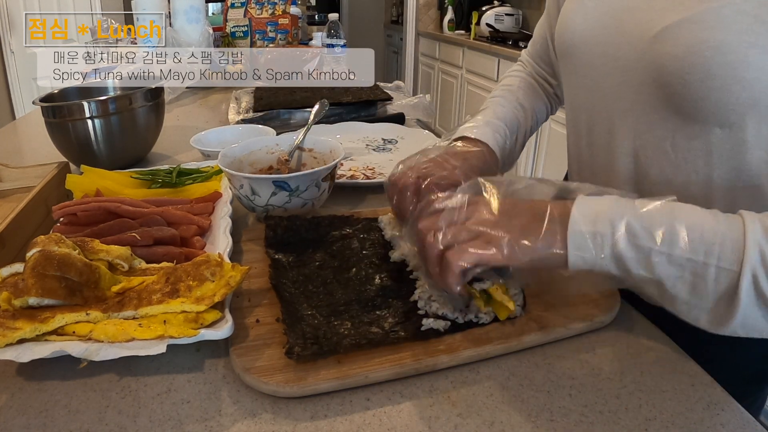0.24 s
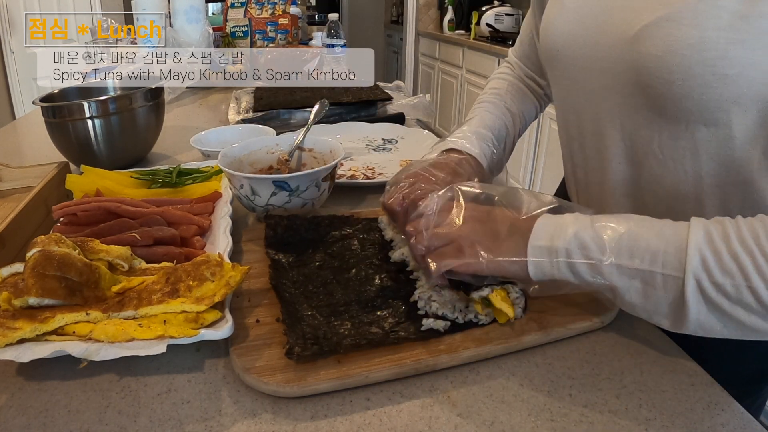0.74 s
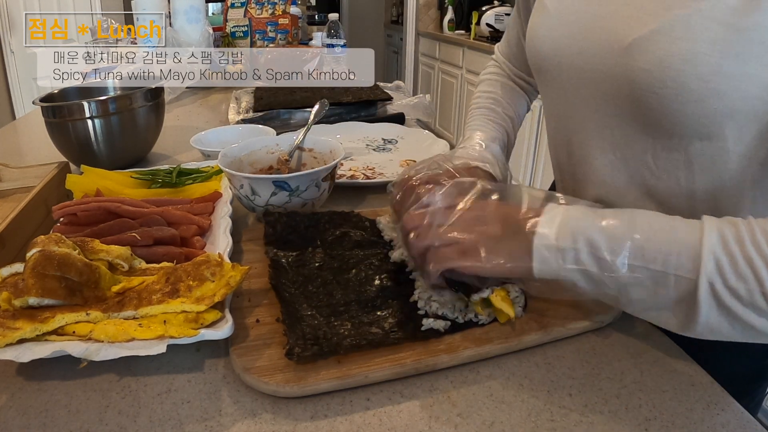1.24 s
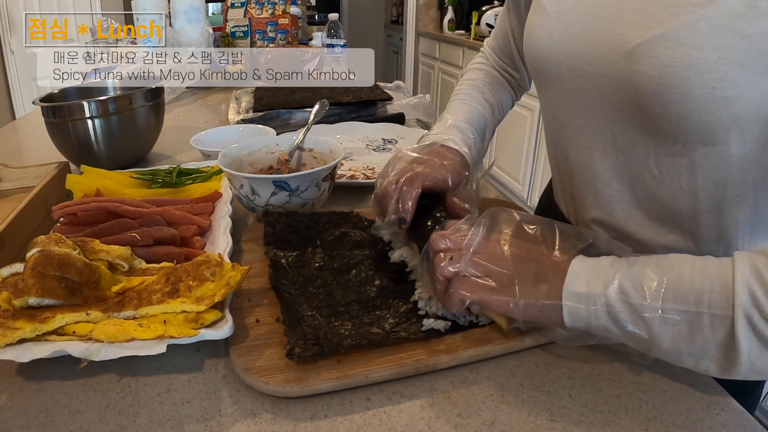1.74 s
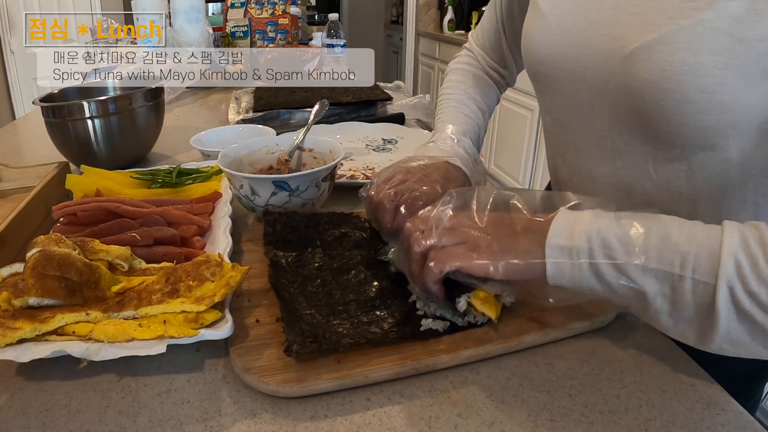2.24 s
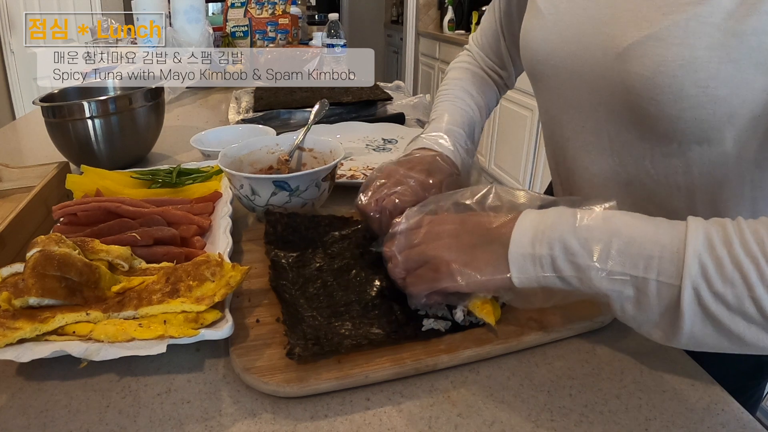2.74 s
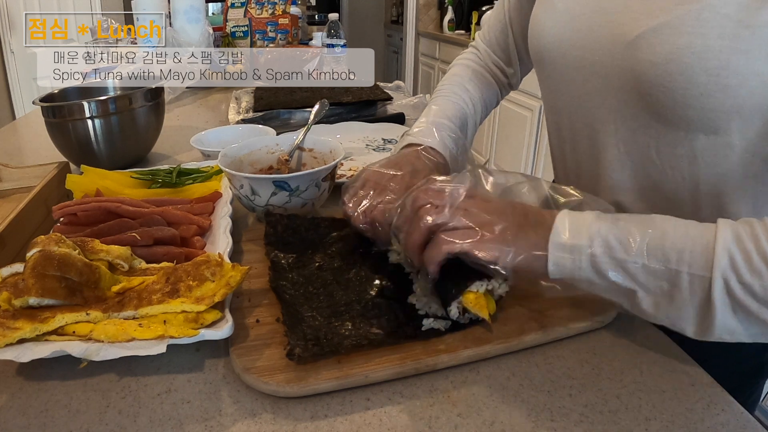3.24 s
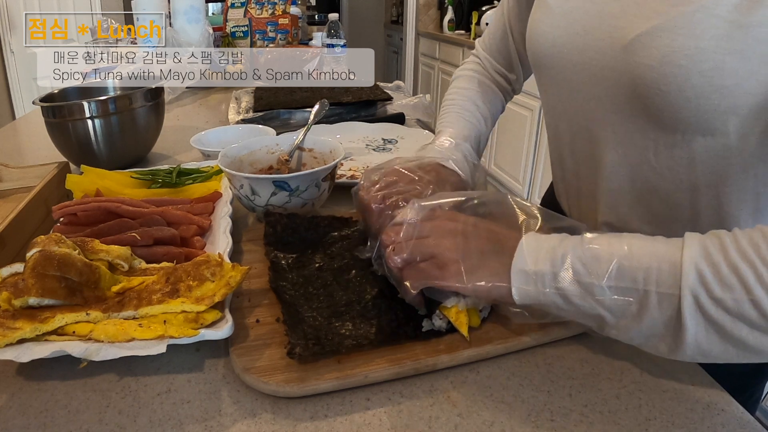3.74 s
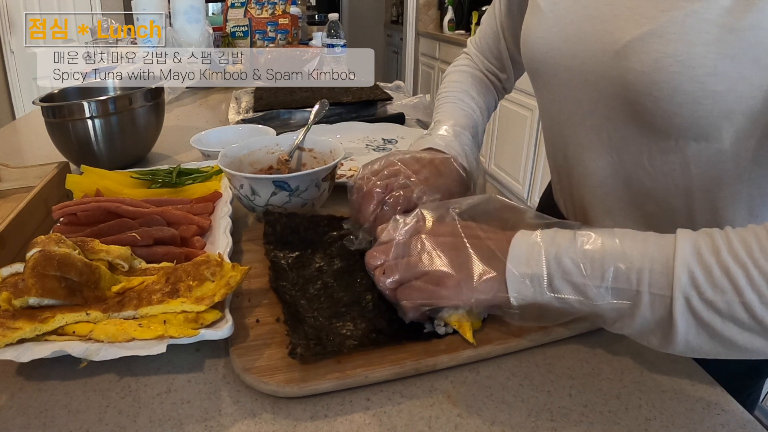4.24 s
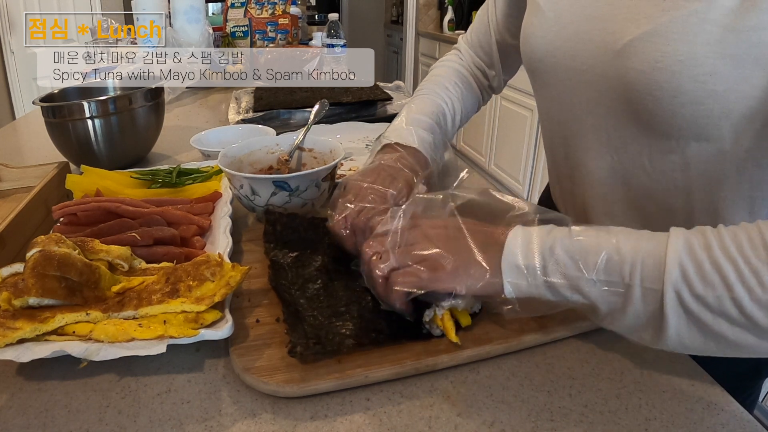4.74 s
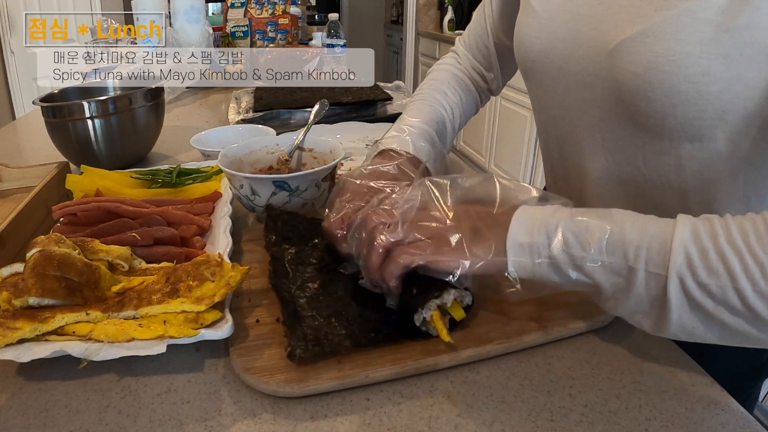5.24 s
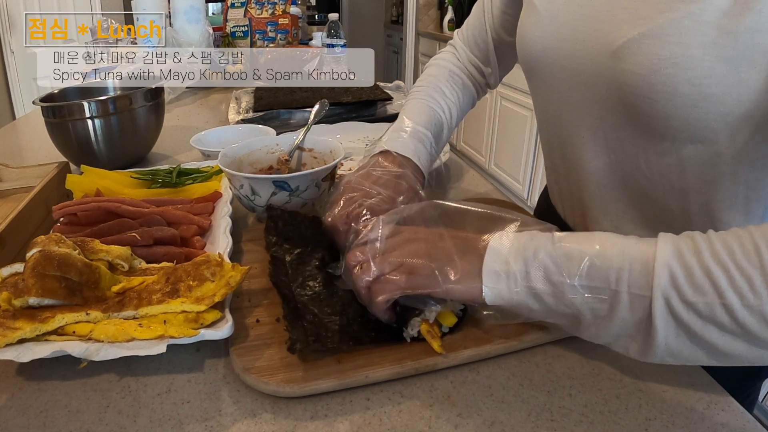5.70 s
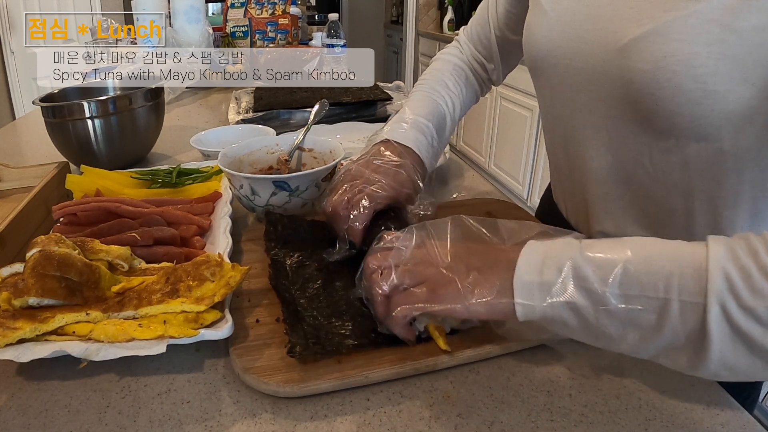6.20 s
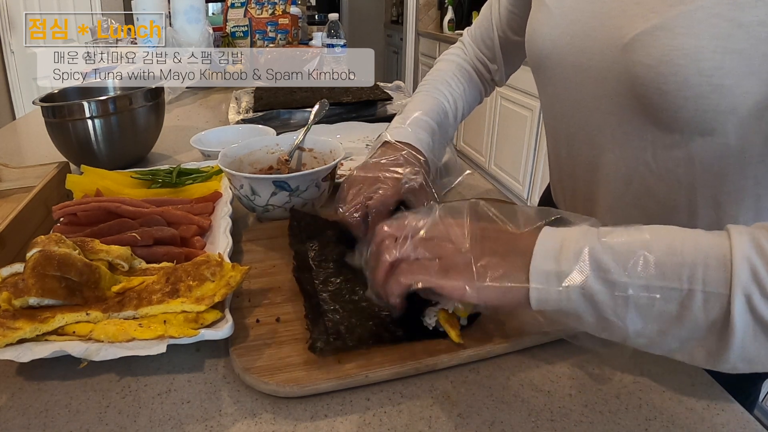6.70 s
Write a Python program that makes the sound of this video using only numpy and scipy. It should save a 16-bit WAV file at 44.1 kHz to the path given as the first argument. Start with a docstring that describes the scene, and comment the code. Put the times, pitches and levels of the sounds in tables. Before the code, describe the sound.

In a small kitchen with a steady, low, slightly wavering drone, thin plastic gloves crinkle close to a stereo microphone, their bright crackle leaning left. A quiet rustle begins at once and swells from 0.3 to 0.7 seconds, with a low thump near 0.4 and a cluster of sharp snaps, the strongest near 0.6. Another stroke comes at 1.1, then the strongest crinkle and a firm knock at 1.4, after a faint dull rub around 1.3. A tiny rice squelch ticks at 1.7. Soft board thumps follow at 2.3, 2.6, 3.5 and roughly every third of a second afterwards, among uneven rustling bursts. It thins briefly near 3.1, then rises at 3.3. A clearer wet pop sounds at 5.7, with fainter ones at 5.9 and 6.5. Thumps at 6.4 and 6.7 accompany brisk crinkling that continues to the end, about 7 seconds.

```python
"""Thin plastic film crinkles at once over a low, steady room drone: gloved hands roll rice and seaweed on wood.
Swells of tiny random buckles follow the strokes of the hands, with sharper snaps where a crease flips over.
Each press rocks the board against the counter, and a soft contact excites its low modes as a thump.
Air pockets in the rice ring softly, and the sliding roll rubs a dull murmur, as band-limited noise, from the wood.
A small kitchen adds a short noise-like tail; two close microphone ports differ in level and phase."""
import sys
import numpy as np
from scipy import signal
from scipy.fft import rfft, irfft, next_fast_len
from scipy.io import wavfile

SR = 44100
rng = np.random.default_rng(int(sys.argv[2]) if len(sys.argv) > 2 else 0)


def generate_wav(sig):
    """Save sig (samples, or channels by samples) to the path in sys.argv[1] as 16-bit PCM at SR."""
    pcm = np.round(np.clip(np.atleast_2d(sig).T, -1, 1) * 32767).astype(np.int16)
    wavfile.write(sys.argv[1], SR, pcm)


N = 306936
TIME = np.arange(N) / SR
SIZE = next_fast_len(N + SR, real=True)  # padded transform length
FREQ = np.maximum(np.arange(SIZE // 2 + 1) * SR / SIZE, 1)

# Steady room noise. Each row: frequency in Hz, relative spectrum level in dB.
ROOM_SPECTRUM = [(25, -21), (95, -19), (125, -15.5), (160, 2), (220, -1), (300, -4), (400, -12.5),
                 (750, -18.5), (1100, -12.5), (3000, -16.5), (8000, -30), (15000, -57)]
# Roll dragging over wood. Each row: middle in seconds, level in dB, half length (to 1/e) in seconds.
ROLL_DRAGS = [(1.264, -57, 0.084), (3.362, -61.5, 0.04)]
# Air pockets opening in sticky rice. Each row: start in seconds, peak level in dB, starting pitch in Hz,
# cycles of ring (to 1/e).
RICE_SQUELCHES = [(1.709, -45, 1760, 4.2), (5.6895, -41.5, 870, 3.5), (5.6905, -30, 2280, 2.3),
                  (5.701, -44, 804, 5.2), (5.908, -39, 2110, 3.6), (6.52, -43, 2100, 3),
                  (6.525, -45, 1430, 2.8)]
# Nominal modes of board and counter. Each row: frequency in Hz, free decay by 60 dB in seconds,
# relative level in dB, left minus right in dB.
BOARD_MODES = [(64.4, 0.36, -3.5, 5), (82.3, 0.31, -10.5, 14.5), (113, 0.24, -7.5, 6.5), (138.5, 1, -16, 7),
               (160.8, 0.53, -10.5, 3), (201.4, 0.47, -29, -11), (233.6, 0.58, -21, 2),
               (269.3, 0.44, -28, 16), (289, 1, -21, 3), (320, 0.051, -7, 14), (352.5, 0.094, -11, -8)]
# Board knocking on the counter. Each row: start in seconds, relative peak level in dB,
# extra weight of the deepest modes in dB.
BOARD_PRESSES = [(0.358, -44, 6.5), (0.4287, -36.5, 4.5), (1.4138, -31.5, -5.5), (1.808, -45.5, -1),
                 (2.3032, -32, 2.5), (2.596, -32.5, -1), (2.9388, -47.5, -5), (3.5453, -32.5, 1),
                 (3.8897, -39, 0), (4.22, -34.5, -2), (4.6107, -35.5, -4), (4.9479, -32, 0),
                 (5.2518, -40.5, 0), (5.5884, -35.5, -4), (5.8138, -34, 0), (6.406, -32, 6),
                 (6.6627, -34.5, 5)]
DEEP_BELOW_HZ = 100
# A firmer press makes a harder contact, which excites higher pitches.
FIRM_DB, CONTACT_HZ, CONTACT_HZ_PER_DB = -32, 252.5, 3.5
# Large creases flipping over. Each row: start in seconds, relative level over 5 ms in dB, pitch in Hz,
# shiver relative to the first pop (ratio).
CREASE_SNAPS = [(0.213, -49, 3520, 1.3), (0.5074, -40.5, 2300, 3.2), (0.5579, -39.5, 4160, 0.89),
                (0.6213, -31, 3435, 0.3), (0.6786, -36.5, 4370, 1.04), (0.714, -44, 4090, 0.6),
                (0.8142, -40.5, 4260, 0.77), (0.905, -43, 4450, 0.91), (1.3151, -42.5, 3160, 1),
                (1.3981, -35.5, 3500, 1.9), (1.565, -41.5, 3100, 0.93), (1.8098, -43.5, 4700, 1.4),
                (1.864, -40, 3700, 0.9), (1.8818, -40, 3580, 0.69), (2.06, -45.5, 5496, 1.4),
                (2.2165, -47.5, 2948, 1.1), (2.2531, -39.5, 2700, 0.88), (2.6557, -41.5, 2896, 0.95),
                (2.9211, -43.5, 3700, 0.77), (3.0146, -51, 3730, 1), (3.0482, -44.5, 3100, 1.3),
                (3.092, -49.5, 4080, 0.6), (3.3206, -51, 2500, 0.6), (3.5108, -45.5, 3500, 0.81),
                (3.642, -45, 3900, 0.45), (3.687, -43.5, 2750, 1.4), (3.9649, -41, 3420, 0.7),
                (4.04, -51, 8000, 1.5), (4.1596, -46.5, 3650, 1.1), (4.2155, -44.5, 4200, 0.65),
                (4.422, -41.5, 2800, 0.51), (4.572, -47, 3100, 0.7), (5.012, -40.5, 3040, 1.1),
                (5.1661, -46, 2880, 1), (5.326, -39, 3570, 0.85), (5.6447, -45, 2700, 1.2),
                (5.815, -49, 7500, 1.5), (5.8795, -43, 3920, 1), (6.0675, -40.5, 2830, 0.7),
                (6.1217, -45, 3060, 1.2), (6.4193, -39, 3100, 0.7), (6.4358, -40, 3460, 1.5),
                (6.7613, -46, 3520, 0.61)]
# Strokes that tuck, roll and squeeze. Each row: fastest point in seconds, relative crinkle level in dB,
# rise in seconds, fall in seconds, treble in dB.
HAND_STROKES = [(.05, -58.5, .1, .07, 4), (.32, -44.5, .06, 0.077, -1.5), (.4, -44.5, 0.068, .06, 2.5),
                (.57, -47, .07, .07, -1), (.68, -46, .07, .12, -2.5), (.86, -54, .1, .12, 4),
                (1.1, -44, .06, .1, -1.5), (1.34, -49, .15, .08, 0), (1.43, -38, .05, .045, 0),
                (1.55, -50, .1, .1, 1), (1.68, -48.5, .1, .09, 1), (1.94, -48.5, .17, .09, -2),
                (2.24, -53.5, .17, .08, -3), (2.34, -43.5, .04, .16, 1), (2.56, -47, .09, .08, 3.5),
                (2.66, -47, .05, .07, -1), (2.79, -53.5, .08, .1, 5), (2.95, -53, .04, .1, -2.5),
                (3.08, -60, .05, .05, 2), (3.335, -41, .075, .065, 1), (3.57, -43.5, .14, .1, -3),
                (3.791, -50, .08, .11, 0.5), (4.0, -42.5, .05, .035, 3), (4.1, -51, .08, .1, 1.5),
                (4.29, -47.5, .07, .12, 1.5), (4.52, -51, .13, .15, -0.5), (4.73, -44, .08, .07, 1.5),
                (4.86, -46, .035, .08, 1.5), (5.019, -47.5, .1, .14, -1.5), (5.24, -52.5, .08, .07, 5),
                (5.345, -42, .05, .06, 0.5), (5.45, -50, .06, .12, 0.5), (5.68, -44, .12, .04, -1.5),
                (5.78, -48.5, .05, .08, 0.5), (5.919, -48, .07, .08, 3), (6.09, -51.5, .11, .08, 2),
                (6.315, -41.5, .05, .06, -0.5), (6.43, -45.5, .04, .07, 0), (6.68, -46, .045, 0.1, 2),
                (6.81, -42, .045, 0.041, 5), (6.922, -44, 0.095, 0.079, -0.5)]
HOLD_DB = -65.5  # relative level of the film while the hands only hold the roll
# Shared stroke shape: dB down at its ends, roundness of its top (exponent),
# and extra treble in dB at its start, as the film first pulls tight.
STROKE_EDGE_DB, ROUNDNESS, TIGHTEN_DB = 8.5, 1.55, 1
# Crinkling film. Each row: frequency in Hz, relative spectrum level in dB.
FILM_SPECTRUM = [(120, -17), (280, -9.5), (500, -8.5), (850, -10), (1080, -2.5), (1500, -5.5), (2100, -3),
                 (3300, -1), (4300, -3.5), (5900, -11.5), (7700, -12.5), (9300, -20), (12500, -34.5),
                 (15500, -49)]
# Level difference of the microphone ports. Each row: frequency in Hz, left minus right in dB.
PORT_LEVEL_DIFFERENCE = [(60, 5.5), (120, -1), (165, -3), (220, 2), (350, -3), (550, -4), (850, -2.5),
                         (1150, 1), (2400, 5), (3500, 8), (5000, 13.5), (7500, 16), (9500, 15),
                         (13000, 10.5)]
# Phase difference of the microphone ports. Each row: frequency in Hz, lead of the left in radians.
PORT_PHASE_LEAD = [(30, 3.5), (100, -1), (200, -1.4), (430, -1.5), (4000, -1.3), (8000, -1.36), (14000, -3)]
TOP_HZ = 15700


def undb(db):
    """Amplitude gain is ten to the power of the decibels over twenty."""
    return 10 ** (np.asarray(db) / 20)


def unit(x):
    """Normalization: division by the root mean square gives rms 1."""
    return x / np.sqrt(np.mean(x ** 2))


def over_freq(points):
    """Interpolation of (Hz, value) points by straight lines on a logarithmic frequency axis."""
    hz, value = np.transpose(points)
    return np.interp(np.log(FREQ), np.log(hz), value)


def causal(db):
    """Minimum phase: folding the cepstrum gives the promptest response with this gain in dB."""
    cepstrum = irfft(db * np.log(10) / 20, SIZE)
    cepstrum[1:SIZE // 2] *= 2
    cepstrum[SIZE // 2 + 1:] = 0
    return np.exp(rfft(cepstrum))


def filtered(x, response):
    """Convolution theorem: filtering multiplies the spectrum by a frequency response."""
    return irfft(rfft(x, SIZE) * response, SIZE)[..., :N]


def butter(x, hz, kind, order):
    """Butterworth low-pass or high-pass filtering, with a maximally flat passband."""
    sections = signal.butter(order, min(hz, SR / 2 - 1), kind, fs=SR, output="sos")
    return signal.sosfilt(sections, x)


def add(out, s, sound):
    """Superposition: mix a sound into out at s seconds."""
    start = max(int(s * SR), 0)
    part = out[..., start:start + sound.shape[-1]]
    part += sound[..., :part.shape[-1]]


def walk(rate):
    """Random modulation of rms 1: lines join independent values drawn rate times a second."""
    steps = rng.standard_normal(2 ** 13)
    return unit(np.interp(TIME * rate, np.arange(len(steps)), steps))


def diffuse(alike_hz):
    """Diffuse-field coherence: noise is alike at both ports in the bass, unrelated in the treble."""
    mid, side = rng.standard_normal((2, N))
    apart = FREQ / np.hypot(FREQ, alike_hz)
    common = filtered(mid, np.sqrt(1 - apart ** 2 / 2))
    opposed = filtered(side, apart / np.sqrt(2))
    return common + np.array([[1], [-1]]) * opposed


def room_noise(level_db=-59.0, waver_db=2.0):
    """A diffuse field of filtered noise gives a low drone, whose level wavers a little."""
    drone = unit(filtered(diffuse(alike_hz=506), undb(over_freq(ROOM_SPECTRUM))))
    return drone * undb(level_db + waver_db * walk(7.7))


def kitchen(x, room_db=-13, dull_hz=8000):
    """Reverberation: counter, cupboards and walls return a short, decaying, slightly dull tail."""
    t60_s, first_s = .38, .0065
    tail = diffuse(alike_hz=2470) * np.exp(-np.log(1000) * TIME / t60_s) * (TIME > first_s)
    tail = butter(tail / np.linalg.norm(tail[0]), dull_hz, "low", order=1)
    return x + undb(room_db) * filtered(x, rfft(tail, SIZE))


def drags(hz=290, width_hz=160):
    """Sliding friction: the damp roll rubs a dull band of noise out of the board."""
    level = sum(undb(db) * np.exp(-((TIME - s) / half_s) ** 2) for s, db, half_s in ROLL_DRAGS)
    band = 1 / (1 + (2 * (FREQ - hz) / width_hz) ** 2)
    return level * unit(filtered(rng.standard_normal(N), band))


def squelches(glide=-0.029):
    """Cavity resonance: small air pockets in the rice open with a soft, slightly falling ring."""
    out, t = np.zeros(N), TIME[:2 ** 11]
    for s, db, hz, cycles in RICE_SQUELCHES:
        age = t * hz / cycles
        swell = 2 * age * np.exp(1 - 2 * age)
        phase = 2 * np.pi * np.cumsum(hz * np.exp(glide * age)) / SR
        add(out, s, undb(db) * swell * np.sin(phase))
    return out


def board(radiate_hz=122, lowest_hz=42, hold_s=0.11, level_db=2.5, vary_db=-0.5, detune=0.03):
    """Modal excitation: each press tips the board onto the counter; soft contact rings only low modes."""
    out, t = np.zeros((2, N)), TIME[:SR // 2]
    hz, t60, mode_db, lean_db = np.transpose(BOARD_MODES)[:, :, None]
    # each mode radiates in its own direction
    toward_ports = undb(np.array([[1], [-1]]) * lean_db.T / 2)
    for s, db, deep_db in BOARD_PRESSES:
        contact_hz = CONTACT_HZ + CONTACT_HZ_PER_DB * (db - FIRM_DB)
        # the hands land on a slightly different spot each time
        weight, stretch = rng.standard_normal((2, len(BOARD_MODES), 1))
        gain = undb(mode_db + vary_db * weight + deep_db * (hz < DEEP_BELOW_HZ))
        decay = np.exp(-np.log(1000) * t / t60)
        ring = np.cos(2 * np.pi * hz * (1 + detune * stretch) * t)
        thump = -toward_ports @ (gain * decay * ring)
        # the growing weight of the hands stills the ring
        thump = butter(thump * np.exp(-(t / hold_s) ** 2), contact_hz, "low", order=4)
        # a small board radiates little bass
        thump = butter(thump, radiate_hz, "high", order=2)
        thump = butter(thump, lowest_hz, "high", order=2)
        peak = np.abs(thump.mean(axis=0)).max()
        add(out, s, undb(db + level_db) * thump / peak)
    return out


def shadowed(straight, bounced):
    """Acoustic shadow: the right port faces away, so its treble arrives mostly by nearby bounces."""
    share = 1 / np.sqrt(1 + (FREQ / 4800) ** 3)
    right = filtered(straight, share) + filtered(bounced, np.sqrt(1 - share ** 2))
    return np.array([straight, right])


def buckle(hz, cycles, scatter, scatter_s):
    """Snap-through of one fold: short ring and shiver. Rows: heard straight, by bounces; energy 1 each."""
    t = TIME[:2 ** 10]
    ring = np.exp(-t * hz / cycles) * np.cos(2 * np.pi * hz * t)
    noises = rng.standard_normal((2, len(t))) * np.exp(-t / scatter_s)
    shiver, bounced = (unit(np.convolve(ring, noise)[:len(t)]) for noise in noises)
    straight = unit(unit(ring) + scatter * shiver)
    return np.array([straight, bounced]) / np.sqrt(len(t))


def snap(hz, shiver, low_hz=1400, brightness=1.62):
    """Snap-through: a crease rings and shivers, brighter if higher; the straight row has rms 1 over 5 ms."""
    pop = buckle(hz, cycles=1.0, scatter=shiver, scatter_s=0.002)
    pop = butter(pop, low_hz, "high", order=1)
    pop = butter(pop, brightness * hz, "low", order=2)
    return pop * np.sqrt(.005 * SR) / np.linalg.norm(pop[0])


def small_snaps(effort_db, level_db=-50, vary_db=0.2, centre_hz=3700, vary_octaves=.35, count=70):
    """Random snap-through: smaller creases flip while the hands move, louder with more effort."""
    out = np.zeros((2, N))
    follow, shiver = .35, .8  # dB of level per dB of effort; shiver ratio
    moving = np.flatnonzero(effort_db > HOLD_DB + 9)
    levels_db = level_db + follow * (effort_db - np.median(effort_db))
    for when, (loudness, pitch) in zip(rng.random(count), rng.standard_normal((count, 2))):
        i = moving[int(when * len(moving))]
        hz = centre_hz * 2 ** (vary_octaves * pitch)
        add(out, i / SR, undb(levels_db[i] + vary_db * loudness) * snap(hz, shiver))
    return out


def snaps(level_db=-0.5):
    """Snap-through of large creases, which stands out of the crinkling."""
    out = np.zeros((2, N))
    for s, db, hz, shiver in CREASE_SNAPS:
        add(out, s, undb(db + level_db) * snap(hz, shiver))
    return out


def hands():
    """Power addition of overlapping strokes gives effort and film brightness over time, both in dB."""
    power, bright = np.full(N, undb(HOLD_DB) ** 2), np.zeros(N)
    for s, db, rise_s, fall_s, treble_db in HAND_STROKES:
        # -1 where the stroke begins, 0 at its fastest, 1 where it ends
        progress = (TIME - s) / np.where(TIME < s, rise_s, fall_s)
        near = np.abs(progress) < 4
        progress = progress[near]
        stroke = undb(db - STROKE_EDGE_DB * np.abs(progress) ** ROUNDNESS) ** 2
        power[near] += stroke
        bright[near] += (treble_db - TIGHTEN_DB * progress) * stroke
    return 10 * np.log10(power), bright / power


def crinkle(effort_db, treble_db, per_s=1300, crowding=1.15, spread_db=3.5, biggest=3.45,
            flicker_db=1.5, grip_db=0.7, rub=0.3, treble_hz=5000, level_db=0.61, count=24):
    """Random buckling: faster hands pop more folds of many pitches, over the hiss of film sliding on film."""
    # per_s is the total rate of pops at median effort, shared by count pitches
    rate = per_s * undb(crowding * (effort_db - np.median(effort_db))) / count
    pops, power = 0, 0
    for hz in np.geomspace(800, 11000, count):
        hits = np.flatnonzero(rng.random(N) < rate / SR)
        # most buckles are tiny, a few are large, and they pop either way
        size_chance, sign_chance = rng.random((2, len(hits)))
        size_db = spread_db * np.minimum(-np.log(1 - size_chance), biggest)
        train = np.zeros(N)
        train[hits] = undb(size_db) * np.sign(sign_chance - .5) / np.sqrt(rate[hits])
        fold = rfft(buckle(hz, cycles=0.76, scatter=0.95, scatter_s=0.0027), SIZE)
        pops = pops + rfft(unit(train), SIZE) * fold
        power = power + np.abs(fold) ** 2
    # all folds together share one smooth spectrum
    pops = irfft(pops / np.sqrt(power), SIZE)[:, :N]
    hiss = rub * rng.standard_normal((2, N))
    film = filtered(unit(pops) + hiss, causal(over_freq(FILM_SPECTRUM)))
    # level flickers in flurries, as one buckle sets off its neighbours; fingers grip and slip more slowly
    flurries_db = flicker_db * walk(130) + grip_db * walk(30)
    film = unit(film * undb(flurries_db)) * undb(effort_db + level_db)
    # tighter film sounds brighter
    treble = filtered(film, 1 / (1 + (treble_hz / FREQ) ** 4))
    return film + treble * (undb(treble_db) - 1)


def scene():
    """Superposition of gloves, rice and board in the kitchen."""
    effort_db, treble_db = hands()
    film = crinkle(effort_db, treble_db) + snaps() + small_snaps(effort_db)
    gloves = shadowed(*film)
    return kitchen(gloves + squelches() + drags()) + board() + room_noise()


def record(dry, notch_hz=8350, notch_width_hz=330, notch_db=-7):
    """Port transfer functions differ in level and phase; the housing notches the treble and the top is cut."""
    ratio = undb(over_freq(PORT_LEVEL_DIFFERENCE)) * np.exp(1j * over_freq(PORT_PHASE_LEAD))
    housing = causal(notch_db * np.exp(-((FREQ - notch_hz) / notch_width_hz) ** 2))
    # the two port responses average to 1
    ports = np.array([2 * ratio / (1 + ratio), 2 / (1 + ratio)])
    heard = filtered(dry, housing * ports)
    return signal.sosfilt(signal.ellip(10, .1, 80, TOP_HZ, fs=SR, output="sos"), heard)


dry = scene()
out = record(dry)
generate_wav(out)
```